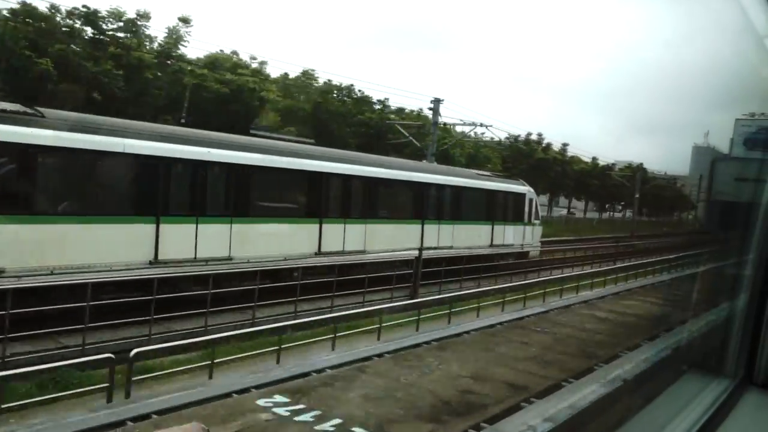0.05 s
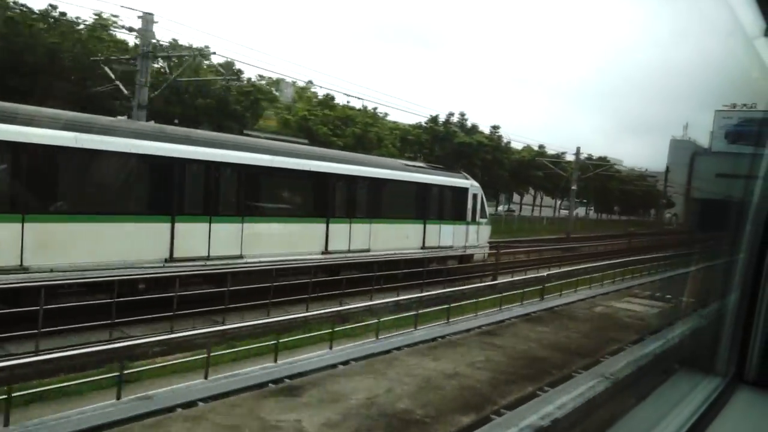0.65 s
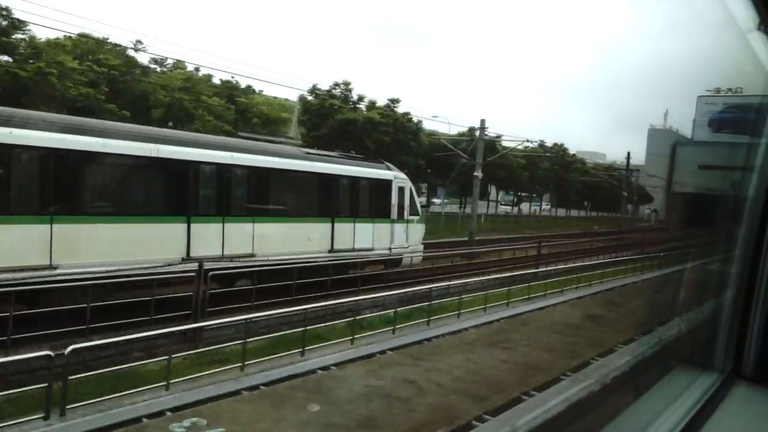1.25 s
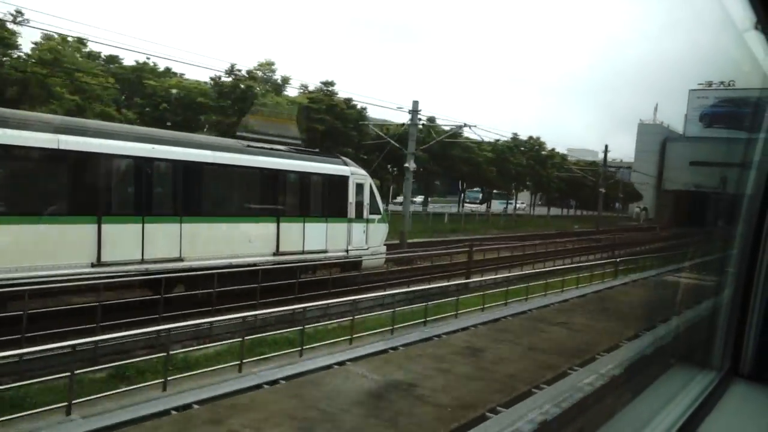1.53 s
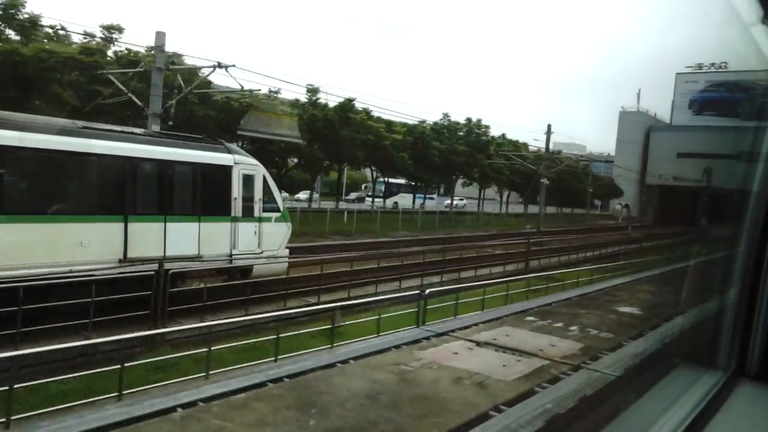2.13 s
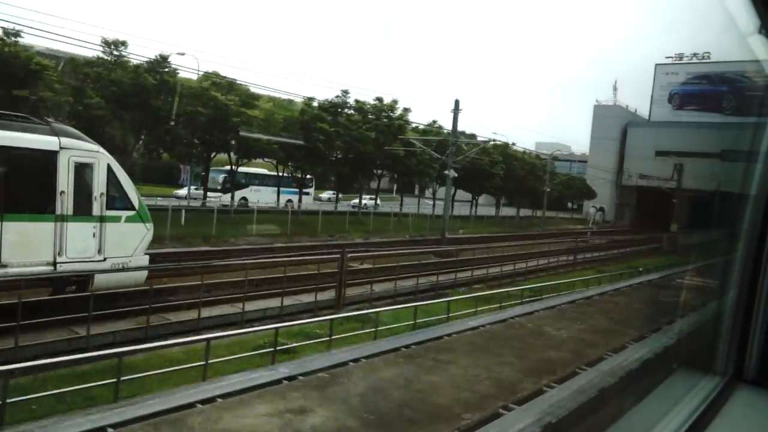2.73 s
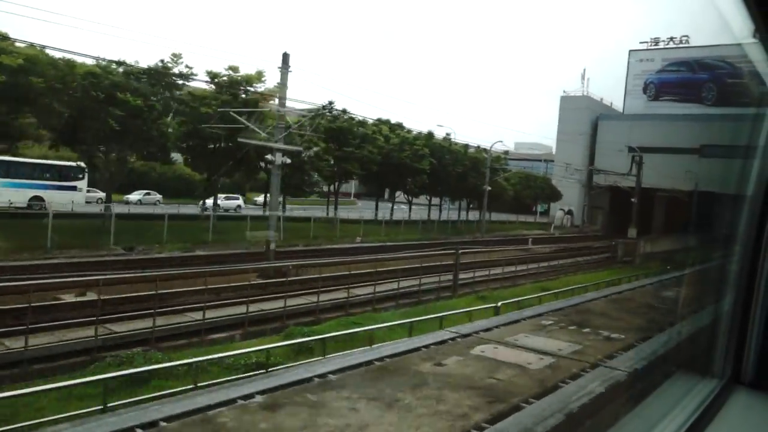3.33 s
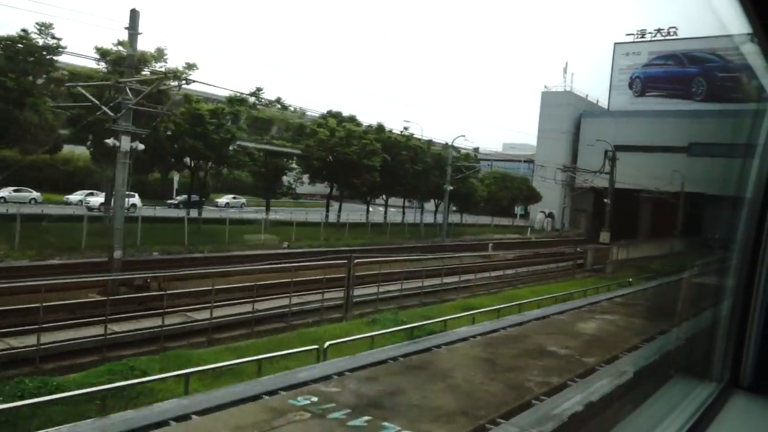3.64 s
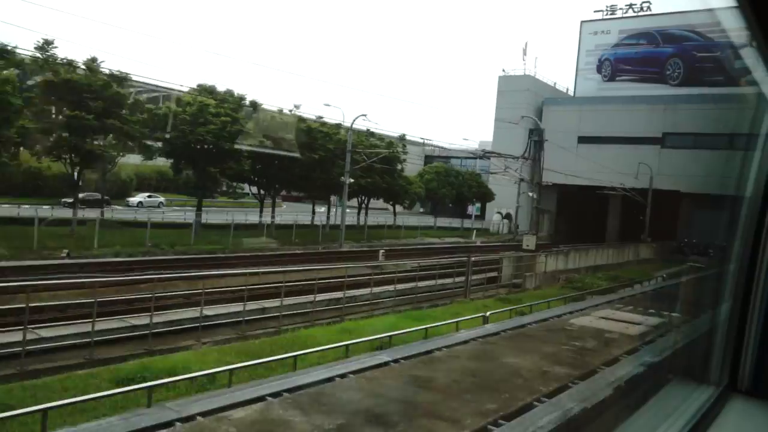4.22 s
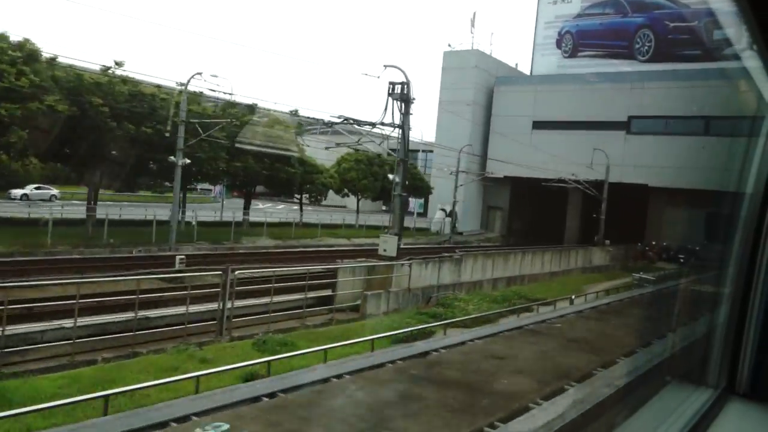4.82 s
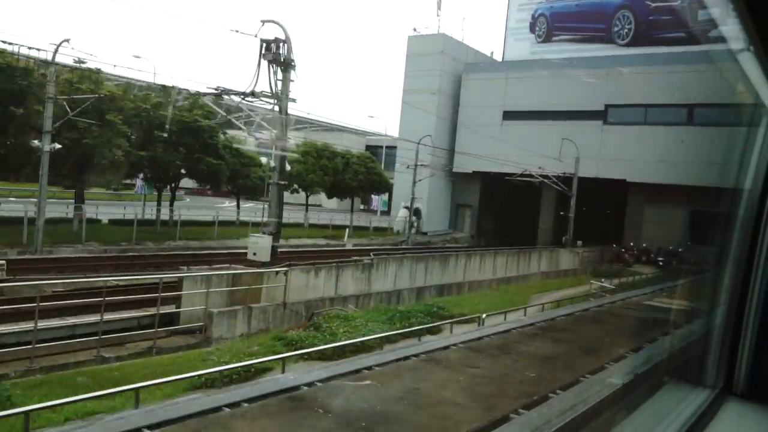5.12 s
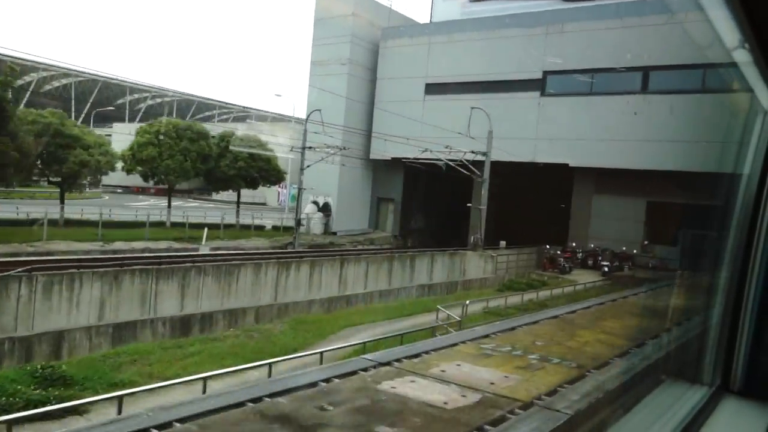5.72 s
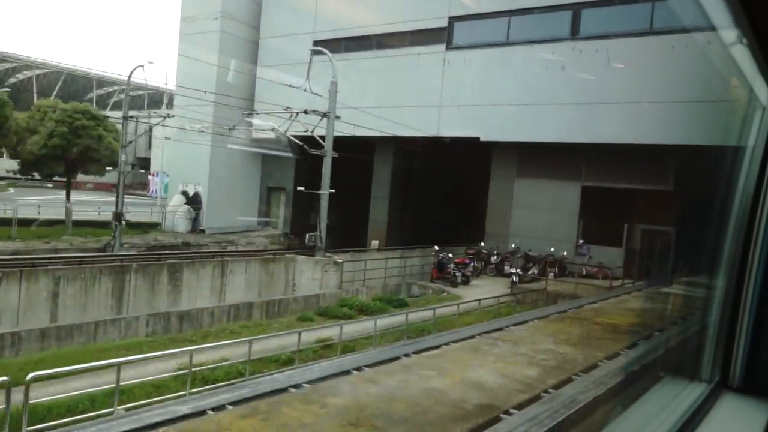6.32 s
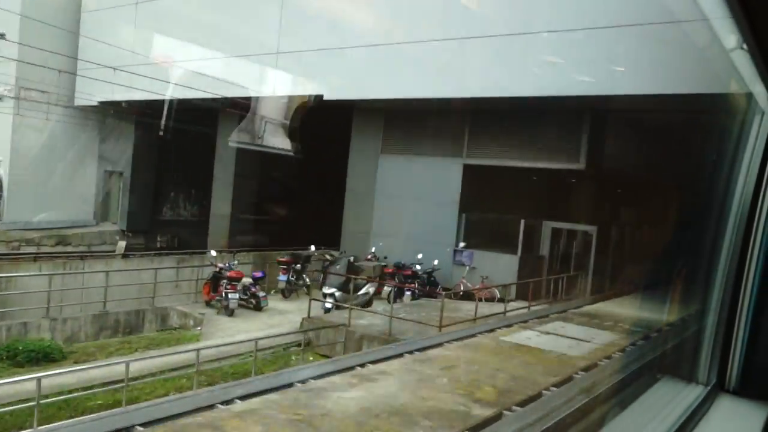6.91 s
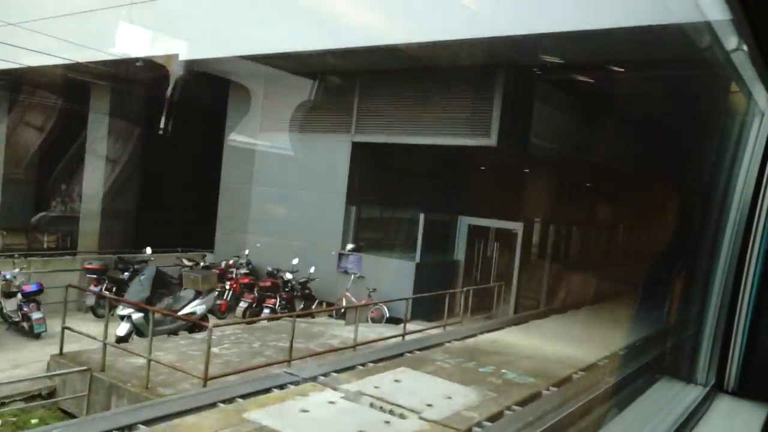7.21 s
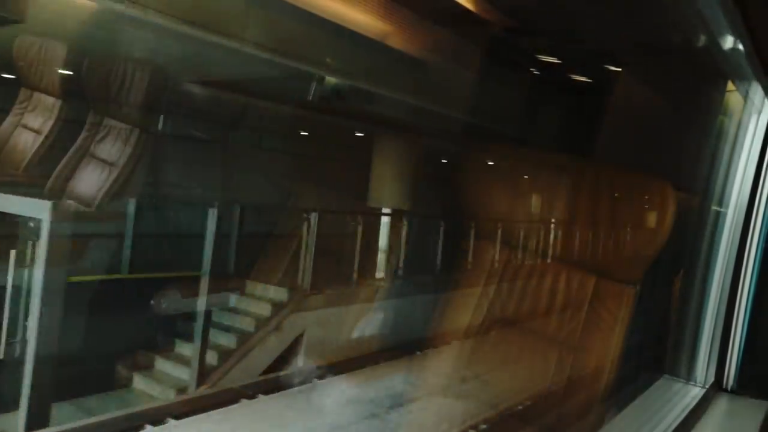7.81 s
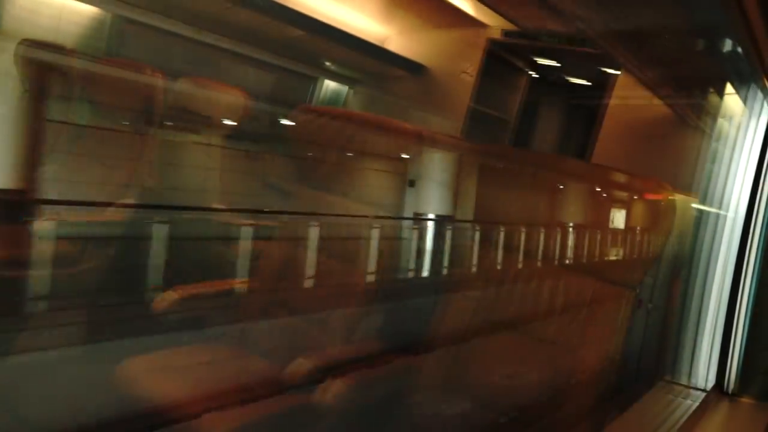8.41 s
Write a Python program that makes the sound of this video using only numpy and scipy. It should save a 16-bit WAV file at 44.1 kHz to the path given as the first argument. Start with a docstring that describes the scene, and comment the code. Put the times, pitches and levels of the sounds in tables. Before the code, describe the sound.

A fast train slows down, heard from a window seat inside the carriage. A throbbing hum slides gradually lower in pitch, swelling and fading, with a thin whine rising and falling in strength above it. Underneath runs a low rumble with soft booms from bumps in the track. Air rushes steadily along the outside, and loose interior panels give faint, brief rattles now and then.

```python
"""Maglev train braking, from a window seat

The slots of the track's stator make the body hum and throb at a pitch that sinks with the speed, and
the overtones swell as they slide through the cabin's resonances. The car rumbles and booms over bumps,
air rushes along the shell and the trim rattles faintly. A gain control ducks it all when the hum swells."""
import sys
import numpy as np
from scipy import signal
from scipy.fft import rfft, irfft, next_fast_len
from scipy.io import wavfile
from scipy.ndimage import map_coordinates

SR = 44100
rng = np.random.default_rng(int(sys.argv[2]) if len(sys.argv) > 2 else 0)


def transcribe(u):
    """Save the signal u as a 16-bit wav file named by the first command-line argument.

    u: samples, shape (n,) or (channels, n), limited to [-1, 1]; the rate is SR.
    q: integer samples, one column per channel.
    """
    v = np.clip(np.atleast_2d(u).T, -1, 1)
    q = np.round(v * 32767).astype(np.int16)
    wavfile.write(sys.argv[1], SR, q)


N = 377055

SLOTS_PER_MODULE = 36
# colour of the air hiss and the panel knocks: f/Hz, level/dB
HISS_COLOUR = [(600, -21.5), (1200, -2.5), (1700, -1.5), (2200, -0.5), (3000, -3), (4200, -8.5),
               (6000, -15), (8500, -21), (12000, -23.5), (15500, -28)]


def amp(db):
    """dB to gain."""
    return 10 ** (np.asarray(db) / 20)


def unit(x):
    """x at rms 1."""
    return x / np.sqrt(np.mean(np.abs(x) ** 2) + 1e-20)


def along(points, hz):
    """Read (f/Hz, value) points on a log frequency axis."""
    freqs, values = np.transpose(points)
    return np.interp(np.log(hz + 1), np.log(freqs + 1), values)


def curves(rows):
    """One automation curve for each column after the time."""
    times, *columns = np.transpose(rows)
    return [np.interp(np.arange(N) / SR, times, column) for column in columns]


def wobble(rate):
    """A smooth random curve, rate knots a second."""
    times = np.linspace(0, N / SR, 2048)
    spline = map_coordinates(rng.standard_normal(size=1024), [times * rate], mode="wrap")
    return np.interp(np.arange(N) / SR, times, spline)


def flutter(rate):
    """Random strength and phase of a vibration, rms 1."""
    return unit(wobble(rate) + 1j * wobble(rate))


def filtered(x, response):
    """x through an EQ, given as gain against frequency."""
    size = next_fast_len(N + 8192)
    return irfft(rfft(x, size) * response(np.fft.rfftfreq(size, 1 / SR)), size)[..., :N]


def cabin_noise(colour, ripple_db=1.5):
    """Stereo noise of rms 1; standing waves ripple its mids differently at each ear."""
    # stereo image, near mono in the bass and wide on top: f/Hz, left-right correlation
    likeness = [(140, .94), (300, 0.6), (500, .45), (1100, 0.6), (2000, .5), (4000, 0.39), (8000, -.08),
                (14000, -0.11)]

    def mid_side_eq(hz):
        spread = np.arccos(np.clip(along([(70, .99)] + list(likeness), hz), -1, 1)) / 2
        return amp(along(colour, hz)) * [np.cos(spread), np.sin(spread)]

    mid, side = filtered(rng.standard_normal((2, N)), mid_side_eq)
    grid_hz = np.arange(500, 4500, 24)
    ears_db = ripple_db * rng.standard_normal((2, len(grid_hz)))
    ripple = lambda hz: amp([np.interp(hz, grid_hz, ear, left=0, right=0) for ear in ears_db])
    return unit(filtered(np.array([mid + side, mid - side]), ripple))


def tone(phase, unsteady, rate, width):
    """A stereo tone of rms 1 that wavers and wanders between the ears."""
    mid = np.exp(2j * np.pi * rng.random()) + unsteady * flutter(rate)
    side = width * flutter(rate)
    return unit(np.real(np.array([mid + side, mid - side]) * np.exp(1j * phase)))


def stator(slot_phase):
    """Magnets pass the slots: a clean hum, sidebands beating against it, a drone of poles and packs."""
    # hum at each ear as the cabin's standing waves shift: t/s, left level/dB, right level/dB
    hum_levels = [(0.0, -18.5, -24), (0.3, -26.5, -21), (0.54, -18.5, -19), (1.98, -9, -12),
                  (2.58, -13, -14.2), (2.7, -20, -22.5), (3.0, -17, -26), (3.3, -12.0, -10.5),
                  (3.78, -11, -11.2), (4.2, -13.5, -16), (4.62, -16.7, -7.6), (4.74, -22.5, -15.5),
                  (4.92, -25.5, -13.5), (5.34, -14.9, -9), (5.94, -19, -14.6), (6.18, -14, -9.5),
                  (6.6, -22.5, -19), (6.78, -11, -10.0), (7.2, -10, -11), (8.1, -16, -14.5),
                  (8.22, -20.5, -21), (8.54, -13.5, -12)]
    # fader on the throb: t/s, level/dB
    throb_levels = [(0, -20.5), (.9, -19.5), (2, -27), (3.1, -18.5), (3.45, -22.5), (3.85, -17.5),
                    (4.9, -19), (5.5, -24), (6, -17), (7.1, -24), (8.54, -26)]
    # tones beside the hum, from the repeating track modules: multiple of the module rate, level/dB
    sidebands = [(32, -15), (33, -7), (34, -5), (35, -21), (37, -10.5), (38, -10.5), (39, -9), (40, -15.5)]
    # weaker tones from the stator packs: multiple of the module rate, level/dB
    pack_tones = [(9, -35), (15, -32.5), (48, -45)]
    module_phase = slot_phase / SLOTS_PER_MODULE
    pole_phase = slot_phase / 3  # one magnet pole to three slots
    ear_lag_rad = .55
    hum = np.sqrt(2) * amp(curves(hum_levels)) * np.cos([slot_phase - ear_lag_rad, slot_phase])
    throb = sum(amp(db) * tone(k * module_phase, unsteady=.98, rate=7, width=.85) for k, db in sidebands)
    poles = amp(-29) * tone(pole_phase, unsteady=.78, rate=3, width=.1)
    packs = sum(amp(db) * tone(k * module_phase, unsteady=.53, rate=2.5, width=.13)
                for k, db in pack_tones)
    drone = amp([[-3], [2]]) * (poles + packs)  # panned right
    return hum + amp(curves(throb_levels)[0]) * throb + drone


def whine(slot_phase, slot_hz):
    """The hum's overtones swell as they cross cabin resonances; a fuzzy band rides under the octave."""
    # cabin resonances: f/Hz, width/Hz, lift/dB
    resonances = [(380.8, 20, 10.5), (408, 5.6, 9), (422, 4.8, 7), (434, 6.4, 5), (464.6, 16, 9),
                  (480.5, 7.4, 4.5), (502, 17, 11.5), (565, 12, 7), (631, 18, 9.5), (700, 24, 4),
                  (789, 41, 9.5), (905, 40, 3)]
    # overtones above the octave: multiple of the slot rate, level/dB before the lift
    overtones = [(3, -48), (4, -51.5), (5, -58)]

    def lift(hz):
        return amp(sum(db / (1 + (2 * (hz - centre) / width) ** 2) for centre, width, db in resonances))

    octave = amp(-38.5) * lift(2 * slot_hz) * tone(2 * slot_phase, unsteady=.49, rate=18, width=1)
    fuzz_db = -33 - .13 * (slot_hz[0] - slot_hz)  # fades as the train slows
    fuzz = amp(fuzz_db) * tone(1.92 * slot_phase, unsteady=4, rate=45, width=3.5)
    upper = sum(amp(db) * lift(k * slot_hz) * tone(k * slot_phase, unsteady=.54, rate=18, width=.49)
                for k, db in overtones)
    return octave + fuzz + upper


def body():
    """The car body and its panels rumble, and bumps in the track make it boom, mostly on the right."""
    # booms over bumps: crest t/s, f/Hz, level/dB
    bumps = [(.45, 60.7, -20), (.54, 83.1, -21.5), (1.15, 64, -27.5), (2.3, 63.1, -23.5), (3.22, 64, -23),
             (3.62, 71.65, -24), (4.2, 58, -26), (4.699, 56.3, -23.5), (4.9, 72.56, -23), (6.92, 62, -25),
             (7.85, 60.7, -24)]
    # faders on the rumble: t/s, deep level/dB, panel level/dB
    rumble_levels = [(0, -31, -18), (.7, -29, -20.5), (1.3, -30, -23), (3.2, -30, -22.5), (3.6, -29.5, -24),
                     (4.5, -30, -23), (5.2, -26.5, -21.5), (6.3, -27.5, -23.5), (7.4, -25, -23.5),
                     (8.3, -27.5, -21)]
    # colour of the deep rumble: f/Hz, level/dB
    deep_colour = [(8, -35.5), (20, -12.5), (32, -8.5), (45, 2.5), (58, 5), (80, -2.5), (110, -15.5),
                   (250, -54.5), (1000, -140)]
    # colour of the wall and floor panels: f/Hz, level/dB
    panel_colour = [(20, -61), (50, -24), (85, 1), (105, -1.5), (135, 1.5), (175, -7.5), (290, -10),
                    (450, -27), (2500, -140)]
    t = np.arange(N) / SR
    swell_s = .1  # half the length of a boom
    booms = np.zeros(N)
    for crest, hz, db in bumps:
        swell = np.exp(-((t - crest) / swell_s) ** 2)
        booms += amp(db) * swell * np.sqrt(2) * np.sin(2 * np.pi * hz * t)
    deep_db, panel_db = curves(rumble_levels)
    deep = amp(deep_db) * cabin_noise(deep_colour) + booms
    panels = amp(panel_db) * cabin_noise(panel_colour)
    return amp([[-3.8], [2.5]]) * deep + amp([[-2.5], [1.8]]) * panels


def airstream(slot_phase):
    """Air roars and hisses on the shell, pulsing lightly with the track modules."""
    # faders on the airstream: t/s, roar level/dB, hiss level/dB
    air_levels = [(0, -35.5, -45.5), (.7, -34, -44.5), (1.1, -36, -46), (1.65, -34, -44.5), (2, -36.5, -46),
                  (2.7, -35.5, -45), (3.25, -33, -45), (3.5, -37.5, -47.4), (4.7, -36, -46),
                  (5.9, -35, -45.5), (6.9, -35, -45), (7.7, -36, -45.5), (8.54, -35, -45.5)]
    # colour of the roar: f/Hz, level/dB
    roar_colour = [(40, -60.5), (150, -22), (260, -6), (340, -3.5), (520, -2.5), (680, -10), (950, -13.5),
                   (1270, -16.5), (1600, -24.5), (2600, -48.5), (6000, -120)]
    roar_db, hiss_db = curves(air_levels)
    module_phase = slot_phase / SLOTS_PER_MODULE
    pulse = np.sin(module_phase + wobble(1.6)) + np.sin(2 * module_phase + wobble(3.7))
    roar = amp(roar_db + 4.5 + .4 * pulse + .76 * wobble(16)) * cabin_noise(roar_colour)
    hiss = amp(hiss_db + .52 + .43 * pulse + .36 * wobble(18)) * cabin_noise(HISS_COLOUR)
    lean_right = lambda hz: amp(np.array([[-.5], [.5]]) * along([(2000, 1), (4000, .058)], hz))
    return filtered(roar + hiss, lean_right)


def trim():
    """Each jolt knocks a loose panel and sets it chattering; between jolts it stirs faintly."""
    # jolts to the trim: t/s, level/dB, t60/s
    jolts = [(1.651, -42, .45), (1.8143, -46, .2), (2.123, -44.5, .25), (2.2814, -46.5, .2),
             (2.5328, -47.5, .4), (2.6901, -45.5, .35), (2.7916, -42, .5), (2.9627, -43, .45),
             (3.332, -48, .15), (3.8428, -47.5, .35), (4.023, -46, .25), (4.184, -44.5, .25),
             (4.358, -47, .2), (4.484, -47.5, .2), (5.021, -45.5, .3), (6.5195, -45, .35),
             (6.689, -43.5, .55), (7.414, -44, .45)]
    # bright colour of the chatter: f/Hz, level/dB
    chatter_colour = [(2000, -29), (4500, -1), (6500, 3.5), (8500, -0.5), (10500, -9.5), (15000, -15.5)]
    t = np.arange(N) / SR
    attack_s = .005
    jolt_power = np.zeros(N)
    for start, db, t60 in jolts:
        age = np.maximum(t - start, 0)
        attack = 1 - np.exp(-age / attack_s)
        jolt_power += (amp(db - 6.5 - 60 * age / t60) * attack) ** 2
    stir_power = amp(-68 + 2.8 * np.tanh(wobble(16))) ** 2
    grain = unit(amp(2.5 * wobble(110)))
    chatter = np.sqrt(stir_power + jolt_power) * grain * cabin_noise(chatter_colour)
    knock = amp(-1.5) * np.sqrt(jolt_power) * cabin_noise(HISS_COLOUR)
    return chatter + knock


def scene():
    """The speed sets the slot rate, which drives hum, whine and the pulsing of the air."""
    # stator slots passed per second as the train brakes: t/s, f/Hz
    slot_rate = [(0, 252.9), (1, 245.2), (2.2, 236.8), (3, 230.9), (4, 225.1), (5, 218.4), (5.7, 213.2),
                 (6.5, 205.3), (7.5, 194.9), (8.55, 185.5)]
    slot_hz, = curves(slot_rate)
    slot_phase = 2 * np.pi * np.cumsum(slot_hz) / SR
    return stator(slot_phase) + whine(slot_phase, slot_hz) + body() + airstream(slot_phase) + trim()


def record(dry):
    """An automatic gain control rides the running level; a brick-wall low-pass trims the top."""
    threshold_db, cut_per_db, reaction_s = -16.5, .39, .19
    top_hz = 15780
    hold = np.exp(-1 / (reaction_s * SR))
    power = np.mean(dry ** 2, axis=0)
    running_power, _ = signal.lfilter([1 - hold], [1, -hold], power, zi=[amp(threshold_db) ** 2])
    over_db = np.maximum(10 * np.log10(running_power) - threshold_db, 0)
    return filtered(dry * amp(-cut_per_db * over_db), lambda hz: hz < top_hz)


dry = scene()
out = record(dry)
transcribe(out)
```